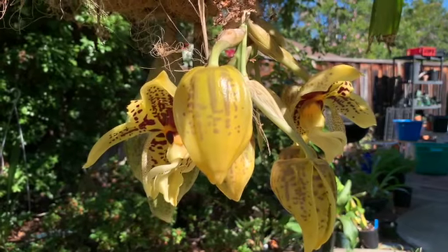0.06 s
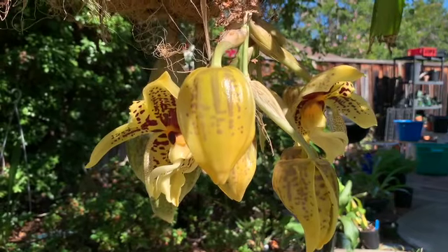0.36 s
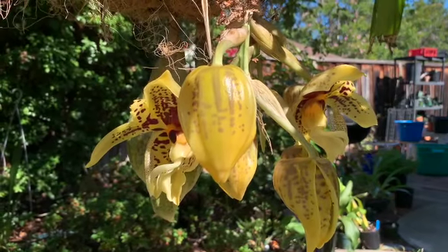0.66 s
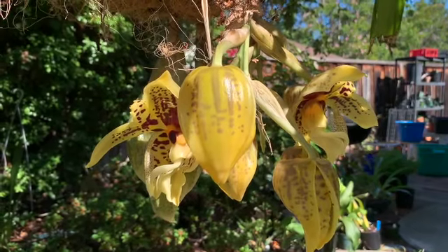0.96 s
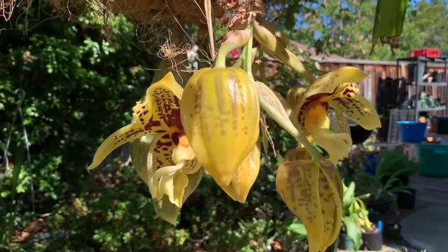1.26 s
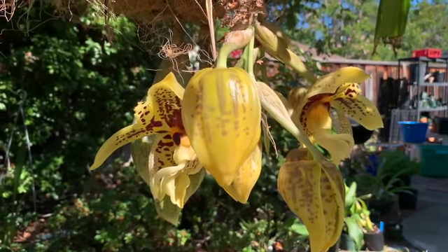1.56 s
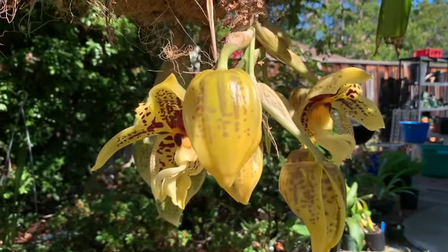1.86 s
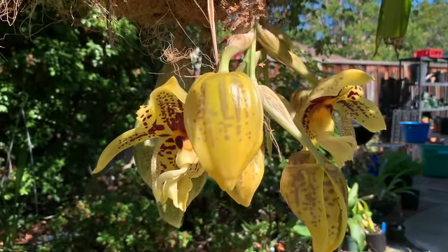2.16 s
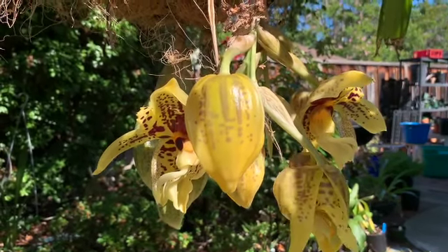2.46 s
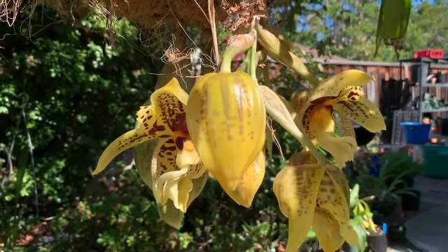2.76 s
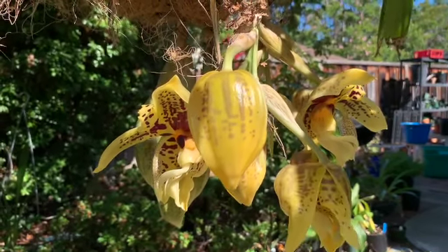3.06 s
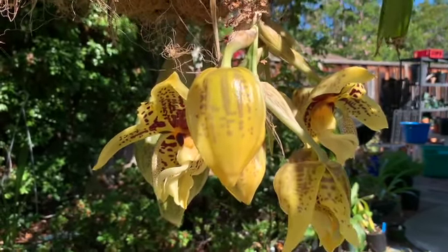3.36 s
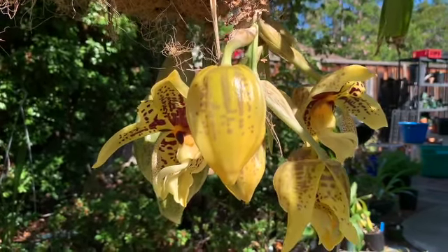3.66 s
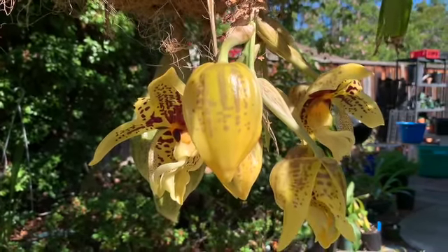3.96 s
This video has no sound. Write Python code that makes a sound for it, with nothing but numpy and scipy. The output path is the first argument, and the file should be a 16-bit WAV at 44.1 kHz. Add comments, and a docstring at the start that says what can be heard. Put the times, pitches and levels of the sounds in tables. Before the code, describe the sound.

A flower bud pops open with one sharp snap over low outdoor rumble and hum.

```python
"""A quiet garden, with a two-port microphone set close to an orchid bud.
From the start: low town rumble, a far machine's hum and whoosh, air and thin hiss; faint far tones and
two bird chips come early. At 2.23 s the seam gives with one snap that rings the hollow bud, then creaks
and tears on for about 60 ms as the sepals spring apart and brush past each other.
The garden carries on, with one more far tone and a last chip near the end."""
import sys
import numpy as np
from scipy import signal
from scipy.fft import rfft, irfft
from scipy.io import wavfile
from scipy.ndimage import uniform_filter1d

SR = 44100
rng = np.random.default_rng(int(sys.argv[2]) if len(sys.argv) > 2 else 0)


def put_to_file(sound):
    """Save the sound as 16-bit audio at rate SR, in the file named by the first command-line argument."""
    columns = np.atleast_2d(sound).T  # one column per channel
    safe = np.clip(columns, -1, 1)
    whole_steps = np.round(safe * 32767)
    wavfile.write(sys.argv[1], SR, whole_steps.astype(np.int16))


N = 176400

# steady noise at the microphone, ahead of trim, pan and swell: f/Hz, density/dB per Hz
TOWN_SPECTRUM = [(15, -100.5), (28, -94.5), (35, -76), (43, -65), (58, -59.5), (82, -62.5), (102, -68),
                 (140, -73.5), (165, -72.5), (200, -78.5), (300, -89.5), (600, -108), (1500, -135)]
WHOOSH_SPECTRUM = [(120, -105), (280, -89.5), (450, -86.5), (600, -92.5), (800, -93.5), (1100, -93),
                   (1350, -103), (1600, -104), (2700, -117), (3700, -117), (6000, -128), (15000, -150)]
AIR_SPECTRUM = [(30, -100), (70, -73.5), (160, -78.5), (300, -82), (480, -92), (750, -89.5), (1300, -100),
                (1600, -104), (2800, -115), (3700, -115.5), (5500, -121.5), (7500, -125), (9000, -132),
                (15000, -142)]
HISS_SPECTRUM = [(3000, -145), (6500, -127), (8400, -119.5), (10000, -120.5), (12000, -122), (15500, -127)]
# slow swell of the whoosh and the air: t/s, gain/dB
AIR_SWELL = [(0, 0), (.4, 0), (.9, -0.8), (1.6, -0.66), (2.2, 0.8), (2.7, -0.65), (3.3, -0.8), (4, -1)]
# far machine's tones: f/Hz, rms level/dB, left minus right/dB, left phase lead/rad
MACHINE_TONES = [(118.8, -53, -4.5, 0), (240.8, -65, -10, 0.23), (480, -75.5, -6, 1.5),
                 (675.5, -72, 5, 2.5)]
# faint held tones from far off: t/s, length/s, f/Hz, level/dB
DISTANT_TONES = [(.14, 0.26, 1566, -75), (1.128, .06, 439, -58), (1.423, 0.039, 773, -62),
                 (3.35, 0.28, 1460, -83)]
# falling bird chips: t/s, length/s, start f/Hz, end f/Hz, level/dB
BIRD_CHIPS = [(.277, 0.01, 10500, 4170, -80), (0.37, 0.0084, 10300, 4000, -77),
              (3.929, .022, 2970, 2400, -75)]
# the seam gives, then catches and slips: t/s, level/dB, hollow f/Hz, sepal re hollow/dB, walls re hollow/dB
SEAM_SNAPS = [(2.2258, -27, 1715, -20.5, -4.5), (2.2416, -46, 1790, -12, -20), (2.25, -51, 1690, -3, -24),
              (2.2585, -42, 1620, -8, -22), (2.2622, -48, 1750, -4, -22), (2.2654, -49, 1690, -14, -22),
              (2.2700, -43, 1630, -17, -28), (2.2759, -38.5, 1750, -4.5, -26), (2.2802, -49, 1870, -4, -20)]
# modes of the bud's stiff walls: f/Hz, relative level/dB, t60/s
WALL_MODES = [(2250, -14, 0.006), (3680, -15, 0.014), (4020, -19, 0.012), (5270, -13.5, 0.0067),
              (6350, -11.5, 0.0083), (7300, -10.5, 0.0076), (8700, -24, 0.0061), (9730, -12, 0.0069),
              (15200, -12, .007)]
# course of the tear along the seam: t/s, level/dB
TEAR_LEVELS = [(2.23, -62), (2.238, -61), (2.249, -66.5), (2.264, -61.5), (2.272, -65), (2.283, -58.5),
               (2.29, -64), (2.32, -81)]
# colour of the parting fibres and of the brushing sepals: f/Hz, relative level/dB
FIBRE_SPECTRUM = [(700, -41), (1100, -19), (1310, -2), (1500, -9), (1750, 1), (2100, -12.5), (2900, -21),
                  (4800, -20.5), (6500, -30), (8200, -35), (15000, -48)]
BRUSH_SPECTRUM = [(1500, -25), (3100, 5), (5000, -10), (8000, -17), (13000, -32)]

HOLLOW_T60_S, SEPAL_HZ, SEPAL_T60_S = 0.013, 1290, 0.024  # the air in the bud; the flexing sepal
CRACK_DB, CRACK_DECAY_S, CRACK_LOW_HZ = -22, 0.0005, 4200  # the breaking tissue itself
HOLLOW_RISE_S, WALL_RISE_S = 0.00066, 0.0001  # the crack takes a moment to open


def undb(db):
    """Decibels to gain."""
    return 10 ** (np.asarray(db) / 20)


def colour(x, points):
    """Filter by a curve of f/Hz, level/dB points."""
    hz, db = np.array(points).T
    f = np.maximum(np.fft.rfftfreq(N, 1 / SR), 1)
    return irfft(rfft(x) * undb(np.interp(np.log(f), np.log(hz), db)), N)


def noise(points):
    """Steady noise with the given density per Hz."""
    return colour(rng.standard_normal(N) * np.sqrt(SR / 2), points)


def drift(per_s):
    """Smooth random wander with a spread near 1."""
    hold = int(SR / per_s)
    steps = np.repeat(rng.standard_normal(256), hold)[:N]
    return np.sqrt(2) * uniform_filter1d(uniform_filter1d(steps, hold), hold)


def pan(db):
    """Port gains for a level difference, left minus right."""
    return undb(np.array([[db], [-db]]) / 2)


def ports(x, lag_ms, turn_rad=0):
    """Off-axis sound reaches the two ports at different times; with a positive lag the left leads."""
    f = np.fft.rfftfreq(N, 1 / SR)
    shift = np.exp(-1j * (2 * np.pi * f * lag_ms / 1000 + turn_rad))
    return np.array([x, irfft(rfft(x) * shift, N)])


def fade(t, t60):
    """Free decay, 60 dB down at t60."""
    return np.exp(-np.log(1000) * t / t60)


def town_rumble():
    """The town's low, uneven rumble, in phase at both ports and louder on the right."""
    gain_db = -1.2 + 1.24 * drift(per_s=24)
    return noise(TOWN_SPECTRUM) * pan(-3.5) * undb(gain_db)


def flicker(x, depth_db=1.65, top_hz=2400):
    """Each narrow band of the distant noise flickers on its own; the treble stays even."""
    octave = np.log2(np.maximum(np.fft.rfftfreq(N, 1 / SR), 1))
    centres = np.r_[6:8:.5, 8:11.5:.2, 12, 13]  # octaves above 1 Hz
    depths = depth_db / (1 + (2 ** centres / top_hz) ** 4)
    spectrum = rfft(x)
    out = 0
    for weights, depth in zip(np.eye(len(centres)), depths):
        band = irfft(spectrum * np.interp(octave, centres, weights), N)
        out = out + band * undb(depth * drift(per_s=14))
    return out


def garden_air(t):
    """The far machine's whoosh from the left and air from all round swell together over thin hiss."""
    whoosh = ports(noise(WHOOSH_SPECTRUM), lag_ms=0.42)
    air = np.array([noise(AIR_SPECTRUM), noise(AIR_SPECTRUM)]) * pan(-0.5)
    hiss = ports(noise(HISS_SPECTRUM), lag_ms=-0.189, turn_rad=0.66)
    swell = undb(np.interp(t, *np.array(AIR_SWELL).T))
    return flicker(whoosh + air) * swell + hiss


def machine_hum(t, wander_rad=0.72, waver_db=2.6):
    """The far machine's tones, each wavering in phase and level."""
    out = 0
    for hz, db, pan_db, lead in MACHINE_TONES:
        phase = 2 * np.pi * hz * t + wander_rad * drift(per_s=5.9)
        peak = np.sqrt(2) * undb(db + waver_db * drift(per_s=5.06))
        out = out + peak * pan(pan_db) * np.sin([phase, phase - lead])
    return out


def far_tones(t, wander_rad=0.52):
    """Thin, wavering tones from far off swell, hold and fade, barely above the air."""
    out = np.zeros(N)
    for at, length, hz, db in DISTANT_TONES:
        progress = np.clip((t - at) / length, 0, 1)
        arch = 2 * np.sqrt(progress * (1 - progress))
        out += undb(db) * arch * np.sin(2 * np.pi * hz * t + wander_rad * drift(per_s=25))
    return out


def bird_chips(t):
    """A bird in the background: very short whistles that drop in pitch."""
    out = np.zeros(N)
    for at, length, start_hz, end_hz, db in BIRD_CHIPS:
        progress = np.clip((t - at) / length, 0, 1)
        hz = start_hz + (end_hz - start_hz) * progress ** 2
        out += undb(db) * np.sin(np.pi * progress) * np.sin(2 * np.pi * np.cumsum(hz) / SR)
    return out


def seam_snaps():
    """Close up, each crack rings hollow, sepal and walls; the hollow's pitch shifts as the bud opens."""
    t = np.arange(SR // 10) / SR
    out = np.zeros(N)
    highpass = signal.butter(2, CRACK_LOW_HZ, "high", fs=SR, output="sos")
    ring = lambda hz, t60: np.sin(2 * np.pi * hz * t) * fade(t, t60)
    walls = sum(undb(db) * ring(hz, t60) for hz, db, t60 in WALL_MODES)
    for at, db, hollow_hz, sepal_db, walls_db in SEAM_SNAPS:
        sepal = undb(sepal_db) * ring(SEPAL_HZ, SEPAL_T60_S)
        pop = (ring(hollow_hz, HOLLOW_T60_S) + sepal) * (1 - np.exp(-t / HOLLOW_RISE_S))
        burst = rng.standard_normal(len(t)) * np.exp(-t / CRACK_DECAY_S)
        crack = undb(CRACK_DB) * signal.sosfilt(highpass, burst)
        tick = (walls + crack) * (1 - np.exp(-t / WALL_RISE_S))
        start = int(at * SR)
        out[start:start + len(t)] += undb(db) * (pop + undb(walls_db) * tick)
    return out


def leaf_scatter(x, t60_s=0.054, dull_hz=4530, gain_db=-18):
    """Brief, duller echoes off the leaves and the basket near the microphone."""
    t = np.arange(SR // 4) / SR
    dull = signal.sosfilt(signal.butter(1, dull_hz, fs=SR, output="sos"), x)
    echoes = rng.standard_normal((2, len(t))) * fade(t, t60_s) * (1 - fade(t, t60_s / 2))
    return undb(gain_db) * np.array([signal.fftconvolve(dull, e / np.linalg.norm(e))[:N] for e in echoes])


def seam_tear(t, fibres_per_s=2000, scatter_db=2, width=0.32):
    """Fibres part one after another along the seam: a dense run of tiny clicks."""
    def fibres():
        clicks = (rng.random(N) < fibres_per_s / SR) * rng.choice([-1, 1], N)
        strength = undb(-scatter_db * rng.standard_normal(N))
        crackle = colour(clicks * strength, FIBRE_SPECTRUM)
        return crackle / crackle.std()
    at, db = np.array(TEAR_LEVELS).T
    envelope = undb(np.interp(t, at, db)) * (t > at[0]) * (t < at[-1])
    mid, side = fibres(), width * fibres()
    return envelope * np.array([mid + side, mid - side])


def sepal_brush(t, at_s=2.286, spread_s=0.0061, level_db=-68):
    """The freed sepals rub softly past each other, right at the microphone."""
    rub = np.array([noise(BRUSH_SPECTRUM), noise(BRUSH_SPECTRUM)])
    envelope = np.exp(-((t - at_s) / spread_s) ** 2 / 2)
    return undb(level_db) * envelope * rub / rub.std()


def scene():
    """The bud close in front, a touch to the right; the garden behind."""
    t = np.arange(N) / SR
    snaps = seam_snaps()
    direct = ports(snaps, lag_ms=-0.03) * pan(-1.5)
    bud = direct + leaf_scatter(snaps) + seam_tear(t) + sepal_brush(t)
    return bud + town_rumble() + garden_air(t) + machine_hum(t) + far_tones(t) + bird_chips(t)


def record(dry):
    """The recorder cuts the top steeply above 16.3 kHz."""
    return signal.sosfilt(signal.ellip(8, .2, 70, 16300, fs=SR, output="sos"), dry)


dry = scene()
out = record(dry)
put_to_file(out)
```